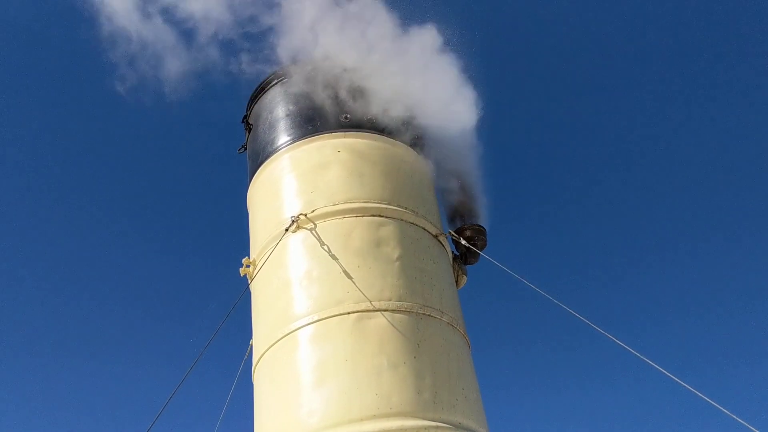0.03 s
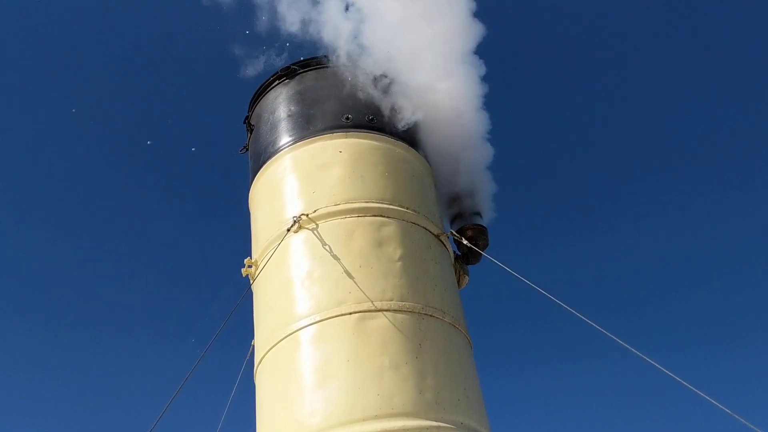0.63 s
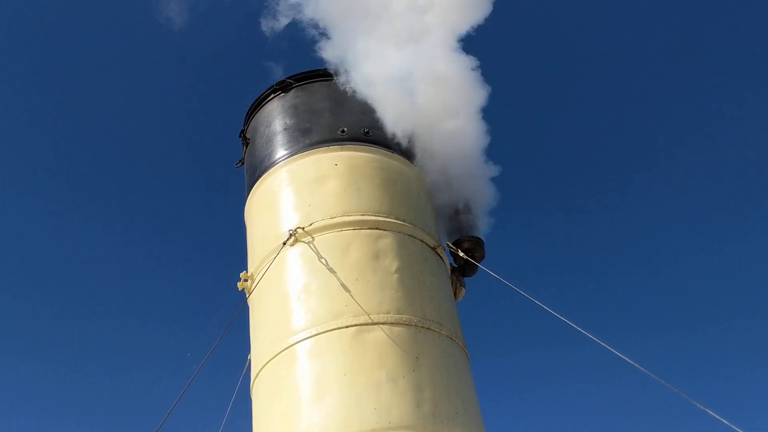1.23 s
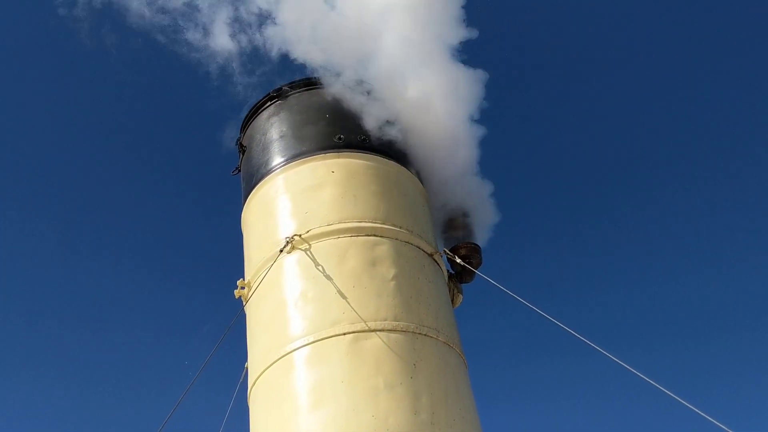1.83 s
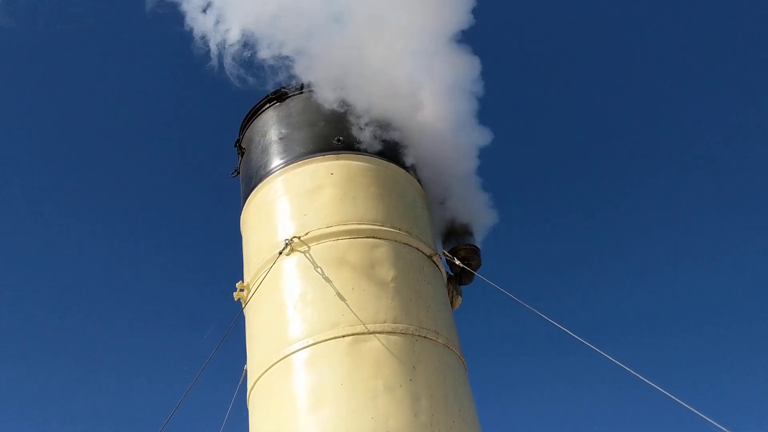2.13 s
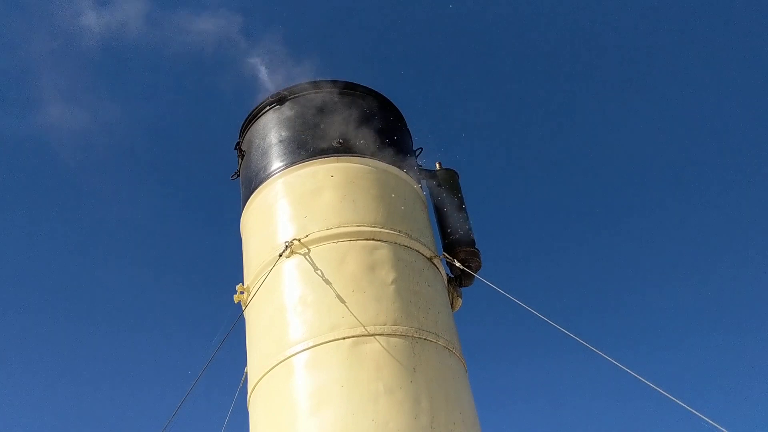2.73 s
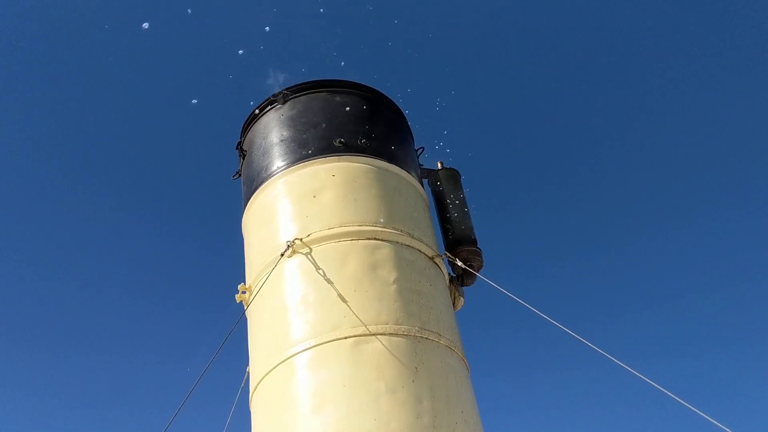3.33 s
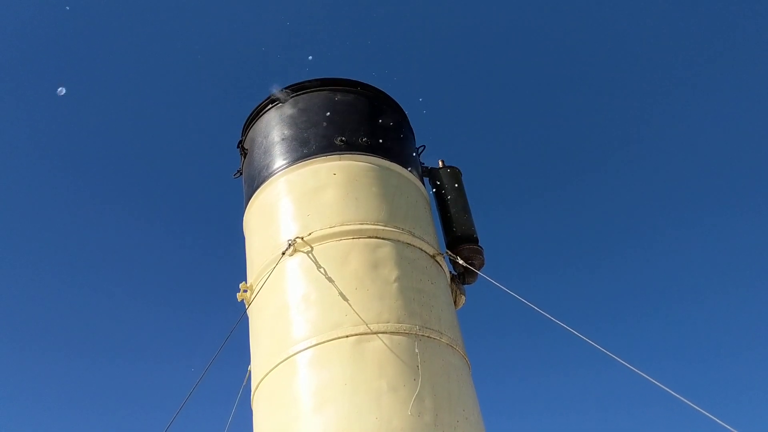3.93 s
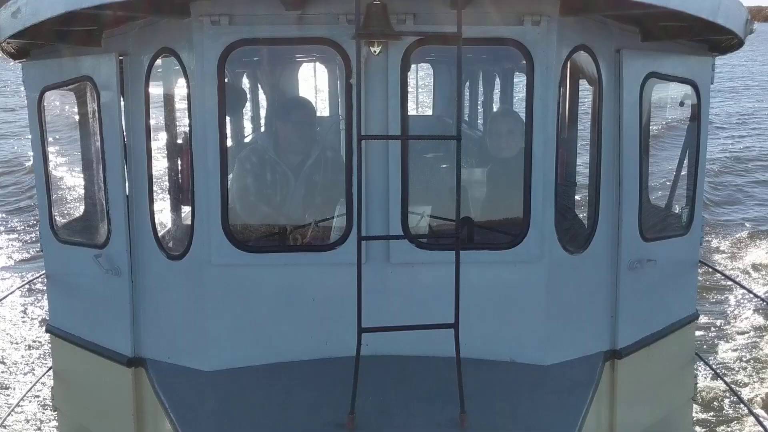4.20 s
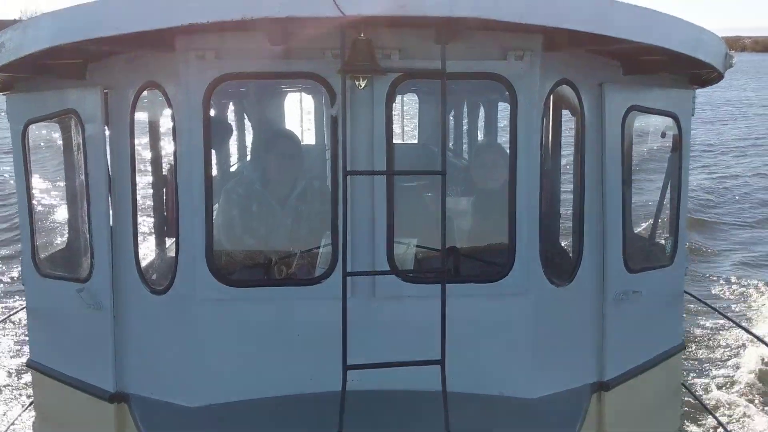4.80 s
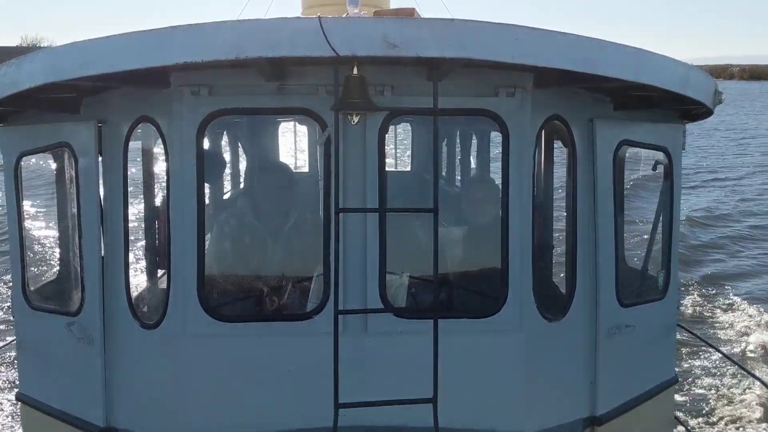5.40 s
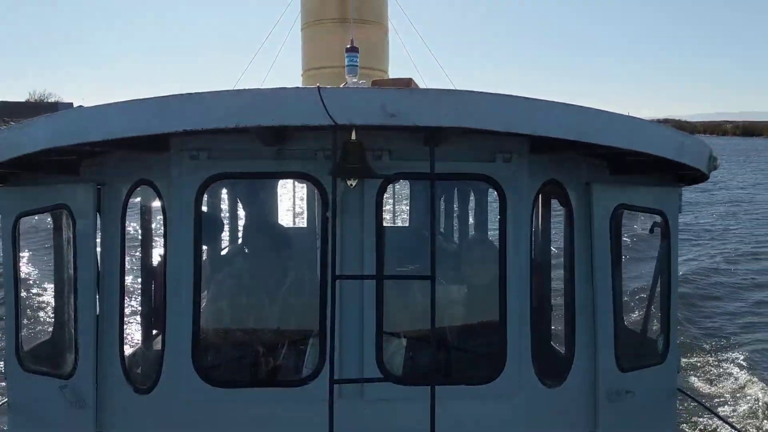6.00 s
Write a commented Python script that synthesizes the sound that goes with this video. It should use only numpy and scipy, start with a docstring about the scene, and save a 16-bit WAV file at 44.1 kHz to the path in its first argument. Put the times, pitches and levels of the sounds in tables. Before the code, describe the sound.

Outdoors on a steamboat, a whistle starts with a rush of steam and holds a loud, low tone for about two seconds, turning raspy as a higher note builds. It stops suddenly and its metal rings faintly. Gusts then rumble and thump on the microphone while a little water drips. Toward the end the wind is heavier and more constant, over the soft wash and spray of the wake.

```python
"""A steamboat's whistle blows for two seconds. First steam hisses out, then the air in the pipe
sounds a low note. From 0.7 s the jet overblows it, and a rough, higher note grows strong.
At 2.4 s the valve shuts and the whistle's metal bell rings on faintly, while condensed water drips
and wind hits the microphone in puffs. From 4.2 s, on the open deck, the wind buffets it steadily
and the boat's wake washes and sprays; near 5.9 s one wave breaks."""
import sys
import numpy as np
from scipy import signal
from scipy.fft import rfft, irfft, next_fast_len
from scipy.io import wavfile
from scipy.ndimage import uniform_filter1d, minimum_filter1d, map_coordinates

SR = 44100
rng = np.random.default_rng(int(sys.argv[2]) if len(sys.argv) > 2 else 0)


def to_wav(sig):
    """Store sig (one row per channel, or 1-D mono) as 16-bit WAV at the path in sys.argv[1].

    Samples outside -1..1 are clipped; the rate is SR.
    """
    pcm = np.clip(np.atleast_2d(sig), -1, 1) * 32767
    pcm = np.round(pcm).astype(np.int16)
    wavfile.write(sys.argv[1], SR, pcm.T)  # frames by channels


N = 271215

SPEAK_S, SPEAK_RISE_S = .318, .035  # the pipe has begun to sound by this time
SHUT_S = 2.39  # the valve closes
OPEN_DECK_S, STEP_S = 4.2, 0.015  # from here on nothing shelters us from wind and wake


def amp(db):
    """Turn decibels into a gain."""
    return np.exp(np.asarray(db) * (np.log(10) / 20))


def unit(x):
    """Scale a signal to an average (rms) size of 1."""
    return x / np.sqrt(np.mean(x ** 2) + 1e-20)


def curve_through(rows):
    """Join rows of (seconds, values...) with straight lines: one curve for each value column."""
    times, *columns = np.transpose(rows)
    return [np.interp(np.arange(N) / SR, times, column) for column in columns]


def ramp(end_s, length_s):
    """Rise straight from 0 to 1 over length_s, arriving at end_s."""
    return np.clip(1 + (np.arange(N) / SR - end_s) / length_s, 0, 1)


def since(s):
    """Seconds gone by since s, 0 before."""
    return np.maximum(np.arange(N) / SR - s, 0)


def hump(t, rise_s, fall_s):
    """A rounded hump of height 1 at t = 0."""
    width = np.where(t < 0, rise_s, fall_s)
    return np.exp(-.5 * np.minimum((t / width) ** 2, 60))


def swell(s, rise_s, fall_s):
    """A hump at time s, one value per sample."""
    return hump(np.arange(N) / SR - s, rise_s, fall_s)


def wobble(rate):
    """A smooth curve through `rate` random points a second."""
    coarse = np.arange(0, N + 16, 16)
    points = rng.standard_normal(int(N * rate / SR) + 4)
    smooth = map_coordinates(points, [coarse * rate / SR])
    return np.interp(np.arange(N), coarse, unit(smooth))


def filtered(x, response):
    """Scale each frequency in x by response(hz)."""
    size = next_fast_len(N + 8192)
    return irfft(rfft(x, size) * response(np.fft.rfftfreq(size, 1 / SR)), size)[:N]


def colour(points, hz):
    """The gain at hz, read from a curve through (Hz, dB) points."""
    point_hz, db = np.transpose(points)
    return amp(np.interp(np.log(hz + 1), np.log(point_hz), db))


def noise(points):
    """Noise of size 1, its tone shaped by (Hz, dB) points."""
    return unit(filtered(rng.standard_normal(N), lambda hz: colour(points, hz)))


def wake(drops_per_s=900, break_s=5.94):
    """Churned water washes along the hull and throws droplets of very different sizes."""
    # The tone of the wash and of the spray. Each row: frequency in Hz, relative level in dB.
    wash_tone = [(100, -8), (600, -4), (1300, 4.5), (2500, 4), (3000, -6.5), (4100, -2), (5200, -10),
                 (6600, 3.5), (8300, -14.5), (9400, -5), (9900, 2), (10500, -7), (16000, -23)]
    spray_tone = [(1200, -19), (2600, -6), (4500, -13), (7000, 3), (9500, 11), (16000, -11)]
    deck = ramp(OPEN_DECK_S, STEP_S)
    wash_db = -57.5 * (1 - deck) - 48 * deck
    wash = amp(wash_db + 1.3 * wobble(7) + 1.3 * wobble(120)) * noise(wash_tone)
    spray_db = -89 * (1 - deck) - 63 * deck + 2 * since(OPEN_DECK_S)
    spray_db += 5.5 * swell(break_s, .087, .087)  # one wave breaks in a shower
    lands = rng.random(N) < drops_per_s / SR
    drops = lands * amp(3.5 * np.clip(rng.standard_normal(N), -2, 2))
    drop_fade = np.exp(-np.arange(SR // 50) / SR / .0006)
    patter = unit(signal.fftconvolve(drops, drop_fade)[:N])
    return wash + amp(spray_db) * patter * noise(spray_tone)


def splashes():
    """Water drips from the whistle, later sprays from the wake: each splash is a bright spit of noise."""
    # Each row: start in seconds, level in dB, fade time in seconds.
    spits = [(2.897, -53, .006), (3.15, -51, .01), (3.413, -49, 0.013), (3.67, -57, .006),
             (3.93, -50, .005), (4.236, -44, .002), (5.276, -45, .002), (5.392, -41, .004),
             (5.428, -42, .004), (5.46, -40, .004), (5.892, -40, .003)]
    level, t = np.zeros(N), np.arange(SR // 16) / SR
    for s, db, fade_s in spits:
        level[round(s * SR):][:len(t)] += amp(db) * np.exp(-t / fade_s)
    return level * noise([(800, -15), (2500, 0), (4500, 3), (8000, -15), (10000, -7), (16000, -8)])


def wind_levels():
    """How loud the wind's rumble and flutter sound, in dB: a steady level with gusts on top."""
    # Each row: peak time in seconds, length in seconds, rumble and flutter strength in dB.
    gusts = [(.05, 0.027, -23.5, -40), (.145, .035, -19.5, -40), (0.504, 0.045, -29, -46),
             (.69, 0.018, -23.5, -50), (1.084, .028, -23.5, -45), (2.55, .03, -27, -33),
             (2.64, .018, -26, -36), (2.77, .025, -17.5, -31), (2.885, .035, -27.5, -31.5),
             (2.993, 0.011, -24.5, -51), (3.2, .025, -22.5, -31), (3.27, .025, -26, -33),
             (3.41, .025, -28, -29.5), (3.476, .03, -23.5, -43), (3.585, 0.039, -20.5, -32.5),
             (3.765, 0.043, -25.5, -38), (3.886, 0.048, -30, -34.5), (3.99, 0.044, -23, -38),
             (4.249, .035, -18, -30.5), (4.424, 0.074, -17, -30.5), (4.56, .015, -19, -33),
             (4.748, 0.039, -18, -28.3), (4.85, 0.025, -17.5, -29.5), (5.12, 0.066, -20.5, -28.5),
             (5.382, 0.057, -19.5, -33), (5.595, .025, -24, -32), (5.73, .02, -24, -32),
             (5.85, .035, -26, -32), (5.914, 0.018, -18.5, -36), (6.133, 0.045, -18.5, -32)]
    # Each pair is (rumble, flutter).
    ducked_db = (-36, -60)  # the wind sounds quieter while the loud whistle blows
    shelter_db, deck_db = (-30.3, -44.5), (-20.8, -32.5)
    after, deck = ramp(SHUT_S + 0.09, .08), ramp(OPEN_DECK_S, STEP_S)
    steady_db = np.outer(ducked_db, 1 - after) + np.outer(shelter_db, after - deck)
    steady_db += np.outer(deck_db, deck) + 1.2 * wobble(12)
    t = np.arange(0, N / SR, .002)
    gust_power = sum(np.outer(amp(levels_db) ** 2, hump(t - s, .78 * length, 1.04 * length))
                     for s, length, *levels_db in gusts)
    return 10 * np.log10(amp(steady_db) ** 2 + curve_through(np.column_stack([t, *gust_power])))


def wind():
    """Swirls of air on the microphone rumble and flutter, rasping more in stronger wind."""
    # The tone of the rumble and of the flutter. Each row: frequency in Hz, relative level in dB.
    rumble_tone = [(20, -30), (32, -14), (46, -0.5), (62, 1.5), (95, -1), (135, -3.5), (180, -8),
                   (250, -16), (420, -28.5), (900, -83)]
    flutter_tone = [(120, -19), (220, 1.5), (310, 0), (600, -6.5), (1200, -17.5), (2400, -29), (4500, -45),
                    (9000, -61)]
    burst = wobble(75)
    rumble_db, flutter_db = wind_levels()
    rumble = amp(rumble_db) * unit(amp(1.6 * burst) * noise(rumble_tone))
    flutter = noise(flutter_tone)
    rasp = filtered(flutter, lambda hz: 1 - 1 / (1 + (hz / 800) ** 4))  # the part above 800 Hz
    rasp_db = -4.0 + 0.23 * (flutter_db + 31.5) + 3.8 * wobble(260)
    ragged = unit(amp(2.58 * burst) * (flutter - rasp + rasp * amp(rasp_db)))
    return rumble + amp(flutter_db + 1.5) * ragged


def crackles(per_s=16):
    """On the open deck small puffs come at random: extra rows for puffs()."""
    # Their shape: half length in seconds, centre in Hz, spread in Hz, relative thump level in dB.
    shape = (.0018, 550, 560, -6)
    gap_draw, level_draw = rng.random((60, 2)).T
    times = OPEN_DECK_S + np.cumsum(-np.log(1 - gap_draw)) / per_s
    levels_db = -28.5 + 2.5 * (2 * level_draw - 1)
    return [(s, db, *shape) for s, db in zip(times, levels_db) if s < N / SR]


def puffs(thump_hz=78.3, thump_fade_s=.0099):
    """A hard swirl passes the microphone: a quick swell of ragged air, then a low thump of pressure."""
    # Each row: peak time in seconds, level in dB, half length in seconds, centre frequency in Hz,
    # spread in Hz, relative thump level in dB.
    sharp_puffs = [(1.082, -25, 0.0088, 120, 200, 10), (2.777, -15.5, .0038, 550, 900, 5),
                   (2.987, -28, 0.0028, 250, 250, 10), (3.118, -23.5, 0.0033, 316, 199, -12),
                   (3.176, -15, 0.0035, 744, 150, -20), (3.186, -18.5, 0.0052, 396, 1120, -1),
                   (3.23, -19.5, .0009, 400, 1300, -3), (3.24, -19.5, 0.0019, 350, 850, -10),
                   (3.252, -29.5, 0.0065, 800, 600, -4), (3.405, -25.5, .006, 500, 340, -5),
                   (3.584, -22, 0.0014, 440, 620, -11), (3.779, -27.5, 0.0038, 435, 347, 4),
                   (3.863, -21.5, 0.0016, 575, 434, -12), (3.991, -16.5, 0.0016, 440, 770, 4),
                   (4.205, -25, 0.0023, 400, 636, 13), (4.225, -23.5, 0.0058, 300, 640, 8),
                   (4.281, -24, .0024, 500, 550, -5), (4.665, -23, 0.0022, 850, 298, -10),
                   (5.059, -24.5, 0.0023, 750, 556, -8), (5.234, -22.5, .0013, 420, 650, -6),
                   (5.988, -22, 0.0022, 600, 500, 7)]
    out, t = np.zeros(N + SR), np.arange(-4096, 4096) / SR
    hz, after = np.fft.rfftfreq(len(t), 1 / SR), np.maximum(t, 0)
    for s, db, half_s, centre_hz, spread_hz, thump_db in sharp_puffs + crackles():
        band = np.exp(-abs(hz - centre_hz) / spread_hz)
        air = irfft(rfft(rng.standard_normal(len(t))) * band)
        shape = (1 + (t / half_s) ** 2 / 2) ** -1.5
        air *= np.linalg.norm(shape) / np.linalg.norm(air * shape)  # size 1 within the swell
        thump = amp(thump_db + 7) * np.sin(2 * np.pi * thump_hz * after) * np.exp(-after / thump_fade_s)
        out[round(s * SR) - len(t) // 2:][:len(t)] += amp(db) * (shape * air + thump)
    return out[:N]


def air_tone(hz, jitter_hz, flicker_db, rough, width_hz):
    """A tone shaken by the jet: its pitch and size waver, and swirling steam adds breath around it."""
    def breath():
        white = rng.standard_normal(N)
        return rough * unit(filtered(white, lambda f: 1 / np.hypot(1, f / width_hz) / (1 + (f / 110) ** 4)))

    phase = 2 * np.pi * np.cumsum(hz + jitter_hz * wobble(50)) / SR
    size = unit(amp(flicker_db * wobble(44.78)))
    tone = (size + breath()) * np.sin(phase) + breath() * np.cos(phase)
    return np.sqrt(2 / (1 + 2 * rough ** 2)) * tone


def overblow(fall_db_per_s=650):
    """How hard the jet drives the upper note: it follows the low one in and dies as the valve shuts."""
    # Each row: time in seconds, strength of the upper note in dB.
    strength = [(.35, -48), (.64, -32.5), (.8, -21), (1.53, -20.5), (1.62, -14.5), (1.88, -11.5),
                (2.02, -17), (2.18, -13), (2.26, -17.5), (2.35, -13.5), (2.4, -25)]
    drive_db = curve_through(strength)[0] - fall_db_per_s * since(SHUT_S)
    return amp(drive_db) * ramp(SPEAK_S, SPEAK_RISE_S)


def bell(max_beat_hz=8):
    """Steam rings the metal until the valve shuts. It is not quite round, so each tone beats with a twin."""
    # The metal's tones. Each row: pitch in Hz, relative level in dB, seconds to fade by 60 dB.
    tones = [(1249, -52, 4.5), (1766, -66, 1.4), (2762, -66, 1.3), (2939, -64, 1.1), (3171, -57, .7),
             (3219, -58, .5), (3661, -66, 1.5), (3704, -62, 1.8), (4107, -67, 1.1), (4290, -69, 1.5),
             (4463, -67, 1.1), (5254, -61, 1.2), (5577, -62, .5), (6130, -70, .5), (7490, -69, .6),
             (7765, -68, .75), (8527, -70, .4)]
    t = np.arange(N) / SR
    after, waver = since(SHUT_S + .08), .5 * wobble(14)
    ring = np.zeros(N)
    for (hz, db, fade_s), (split, offset) in zip(tones, rng.random((len(tones), 2))):
        live = slice(0, int((SHUT_S + fade_s) * SR))
        phase = 2 * np.pi * hz * t[live] + np.roll(waver, int(offset * N))[live]
        beat_hz = max_beat_hz * (1 + split) / 2
        twin = .45 * np.sin(phase + 2 * np.pi * (beat_hz * t[live] + offset))
        ring[live] += amp(db + 3.8 - 60 * after[live] / fade_s) * (np.sin(phase) + twin)
    # at full pressure the jet sings faintly on the edge, near the metal's lowest tone
    edge = air_tone(tones[0][0], jitter_hz=6, flicker_db=2, rough=.5, width_hz=14)
    return ramp(SHUT_S, SHUT_S) * ring + amp(-22.5) * overblow() * edge


def steam(cut_db=21, cut_s=.039, empty_db_per_s=210):
    """The jet roars at the pipe's mouth and hisses at the slot; both flutter together."""
    # How loud the steam sounds; it dips as the note comes in.
    # Each row: time in seconds, relative level in dB.
    steam_level = [(0, -36), (.08, -31.5), (.2, -30.5), (.25, -28.5), (.31, -27.3), (.37, -31.5),
                   (.92, -31.8), (1.33, -29.5), (2.18, -28.8), (2.25, -27), (2.39, -30.5)]
    # The tone of the roar and of the hiss. Each row: frequency in Hz, relative level in dB.
    roar_tone = [(100, -32), (220, -0.5), (330, 3), (480, -2), (620, -4), (740, 2.5), (930, 5), (1050, 1),
                 (1330, -3), (1540, -2), (1680, -6.5), (1880, -26), (3000, -62)]
    hiss_tone = [(800, -7.5), (1700, -6.5), (2150, -9.5), (2600, 0), (3100, 1), (3500, -2), (4100, -0.5),
                 (6000, 3), (16000, -0.5)]
    steam_db = curve_through(steam_level)[0] + 0.54 * wobble(14.04)
    # the level drops as the valve closes, then the pipe empties
    steam_db -= cut_db * ramp(SHUT_S + cut_s, cut_s) + empty_db_per_s * since(SHUT_S + cut_s)
    flutter = wobble(70)
    roar_db = steam_db - 1 + 2.15 * since(0) + .5 * flutter
    roar = amp(roar_db) * ramp(.12, .12) * noise(roar_tone)
    hiss = amp(steam_db + 4.0 + 0.59 * flutter) * noise(hiss_tone)
    return roar + hiss


def notes(drive):
    """Pitch of both notes and strength of the low one, from the pipe's heat and the overblow."""
    # The pitch sags on cold, wet steam and climbs with heat. Each row: time in seconds, pitch in Hz.
    pitch = [(.24, 281), (.45, 275.5), (.8, 272), (1.27, 275.5), (1.5, 279.5), (1.8, 278.5), (2.34, 282.5),
             (2.44, 275)]
    lock_s, lock_rise_s = .7, .073  # the upper note locks in, and the low one grows with it
    scoop_hz, scoop_s = 55, .065  # the upper note slides up into that lock
    stir_s, stir_db, speak_db = .235, -23, -14.3  # the low note stirs softly before it sounds fully
    hard = 1 / (1 + (amp(-17) / (drive + 1e-6)) ** 4)  # 0 when blown gently, near 1 when blown hard
    low_hz, = curve_through(pitch)
    high_hz = 3 * low_hz - 15 * hard  # hard blowing pulls the upper note flat
    high_hz -= scoop_hz * swell(lock_s - lock_rise_s, scoop_s / 2, scoop_s)
    low_db = stir_db + (speak_db - stir_db) * ramp(SPEAK_S, SPEAK_RISE_S)
    low_db += 4 * ramp(lock_s, lock_rise_s) + .7 * wobble(14)
    low_db -= 3.8 * hard  # the upper note robs the low one
    low_db -= 420 * since(SHUT_S + .012)  # it dies just after the valve shuts
    return low_hz, high_hz, amp(low_db) * ramp(stir_s, SPEAK_RISE_S)


def whistle(flap_hz=136):
    """One jet sounds two notes in the pipe, the upper at nearly three times the lower's frequency."""
    drive = overblow()
    low_hz, high_hz, low_size = notes(drive)
    breathy = .23 + 1.2 / (1 + (drive / amp(-30)) ** 2)  # clears as the upper note locks in
    low = low_size * air_tone(low_hz, jitter_hz=1.6, flicker_db=.45, rough=.06, width_hz=14)
    high = drive * air_tone(high_hz, jitter_hz=3, flicker_db=1.1, rough=breathy, width_hz=18.5)
    # slightly out of tune, the notes trade strength back and forth
    beat = drive * np.sin(2 * np.pi * np.cumsum(3 * low_hz - high_hz) / SR)
    low, high = low * (1 + 0.53 * beat), high * (1 - beat)
    # blown hard, the jet flaps and makes both notes rasp
    flap = drive * air_tone(flap_hz, jitter_hz=14.2, flicker_db=-1.5, rough=0.52, width_hz=14)
    rasp = flap * (0.42 * low + .5 * high)
    # the jet adds sum and difference tones; the mouth sends out the high ones best
    mixed = amp(-13.5) * low ** 2 + amp(-3.5) * low * high
    extra_tones = filtered(mixed, lambda hz: colour([(200, -53), (550, -4.0), (1100, 4.5)], hz))
    return low + high + extra_tones + rasp


def scene():
    """Whistle overhead, wind and water around the deck, in one channel."""
    return (whistle() + steam() + bell() + wind() + wake() + splashes() + puffs())[None]


def record(dry, ceiling_db=-3.0, low_cut_hz=38, top_hz=15700):
    """The microphone drops the deepest bass and colours the treble; a fast limiter holds the peaks."""
    # The microphone's colour. Each row: frequency in Hz, gain in dB.
    mic_tone = [(3900, -0.5), (4150, -0.5), (4500, -5.5), (5350, -2.5), (6600, -16.5), (7300, -5),
                (8200, 3.5), (8750, 5.5), (9300, -5.5), (9870, -29), (10400, -19), (11200, -16.5),
                (12000, -27.5), (13200, -21), (15600, -35)]
    heard = filtered(dry[0], lambda hz: colour(mic_tone, hz) * (1 - 1 / (1 + (hz / low_cut_hz) ** 4)))
    needed_gain = np.minimum(1, amp(ceiling_db) / (abs(heard) + 1e-9))
    gain = uniform_filter1d(minimum_filter1d(needed_gain, size=441), size=441)
    end_fades = np.minimum(1, np.minimum(np.arange(N), np.arange(N)[::-1]) / 128)
    return filtered(heard * gain * end_fades, lambda hz: hz < top_hz)[None]


dry = scene()
out = record(dry)
to_wav(out)
```